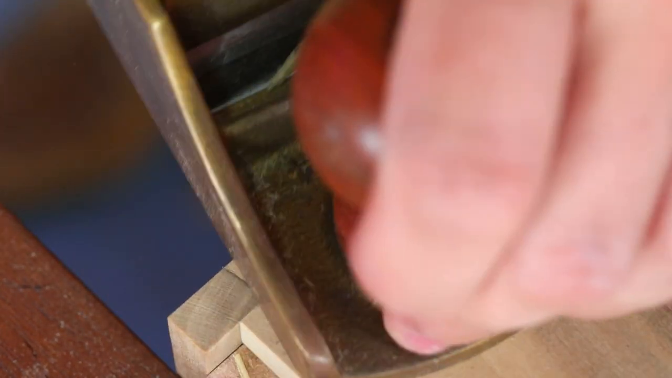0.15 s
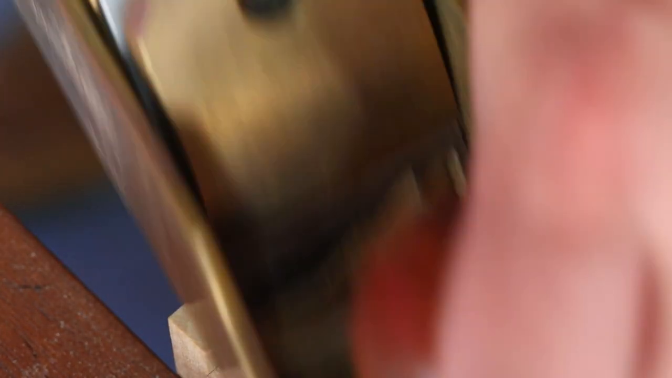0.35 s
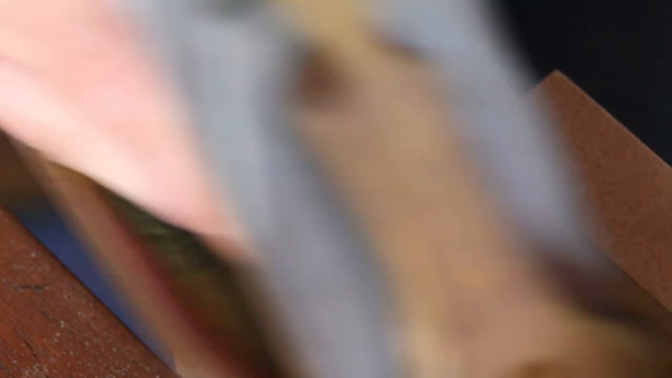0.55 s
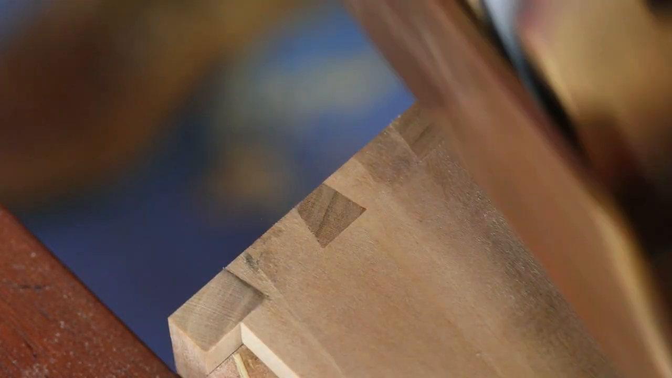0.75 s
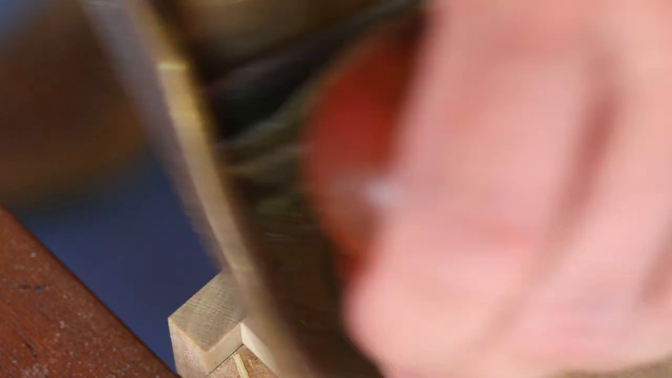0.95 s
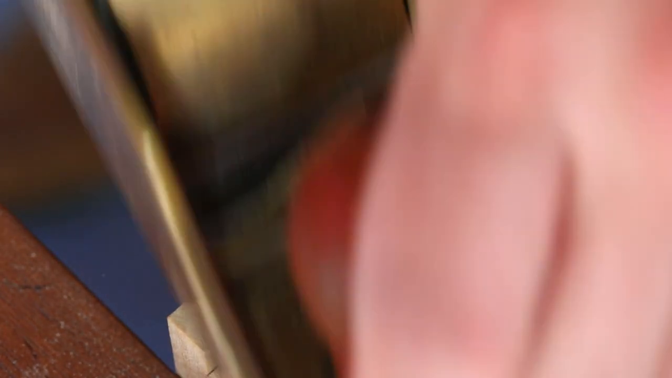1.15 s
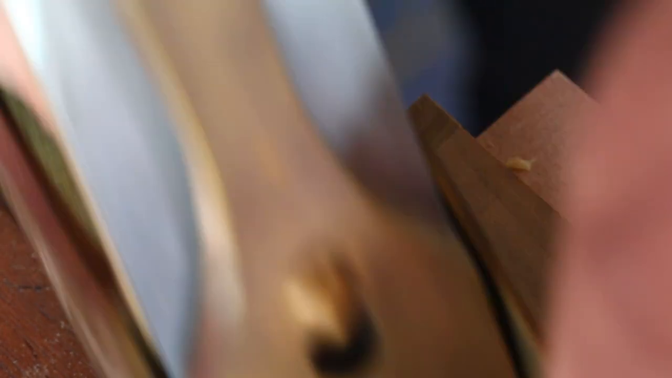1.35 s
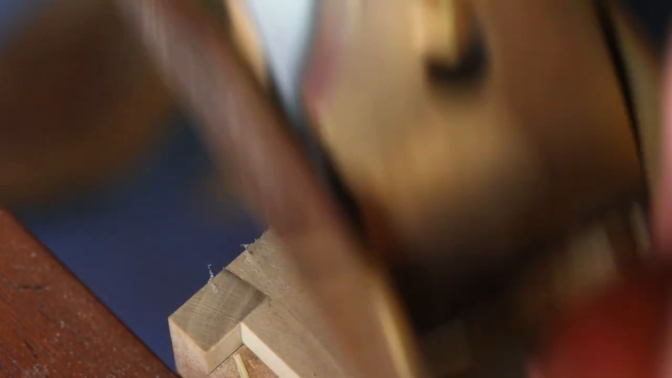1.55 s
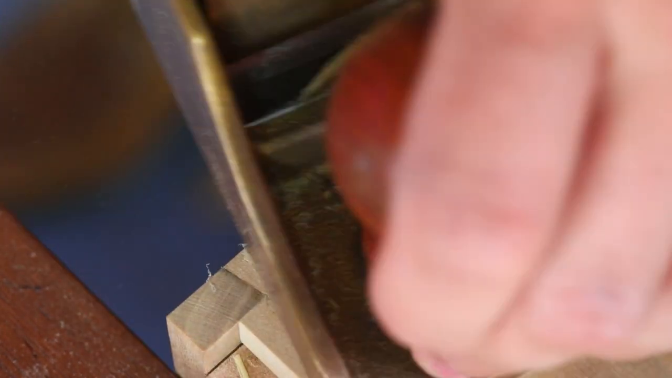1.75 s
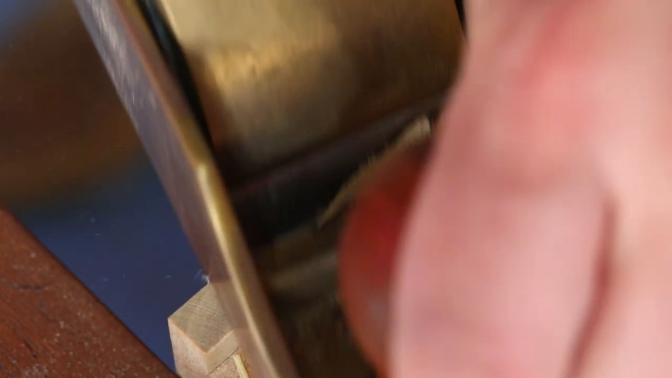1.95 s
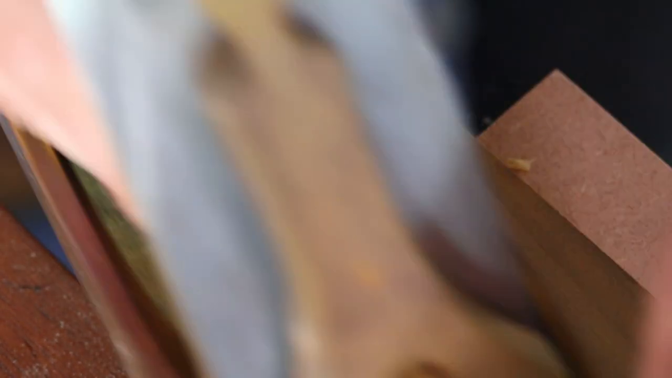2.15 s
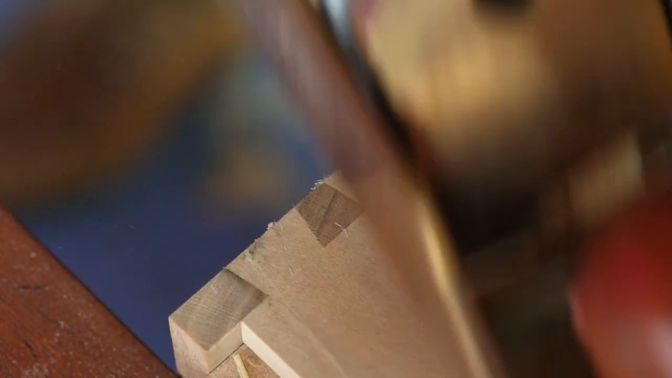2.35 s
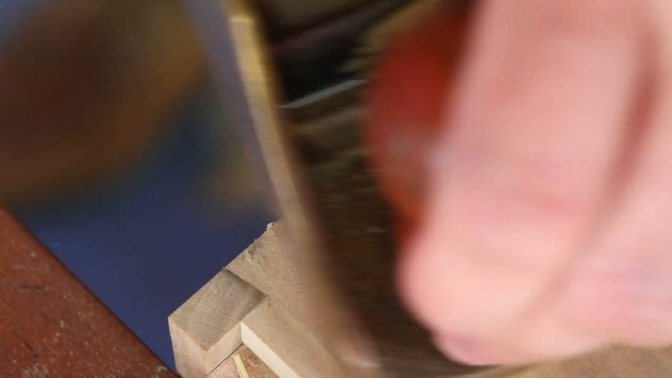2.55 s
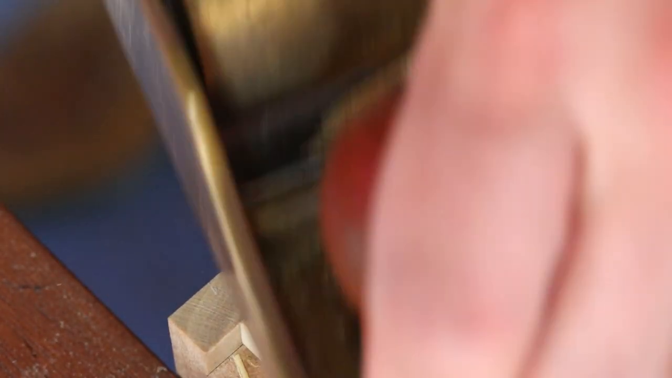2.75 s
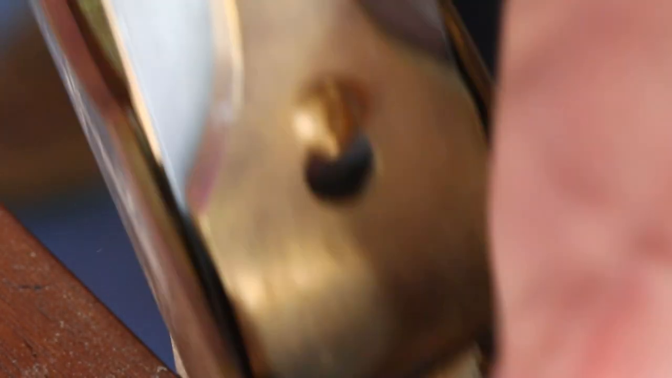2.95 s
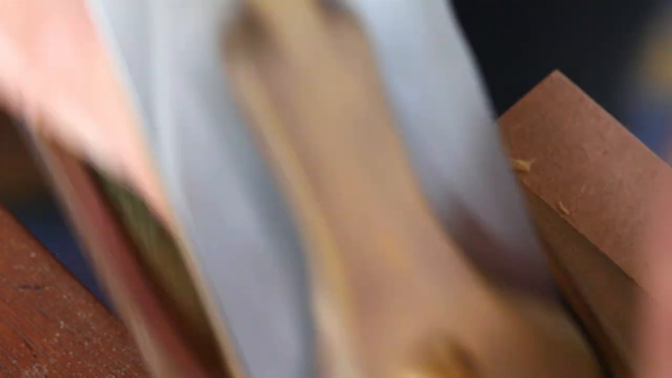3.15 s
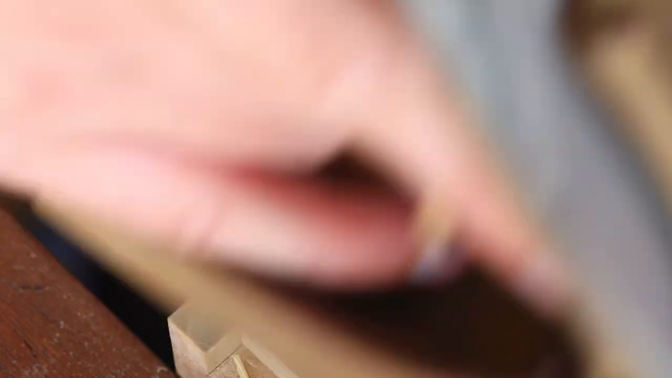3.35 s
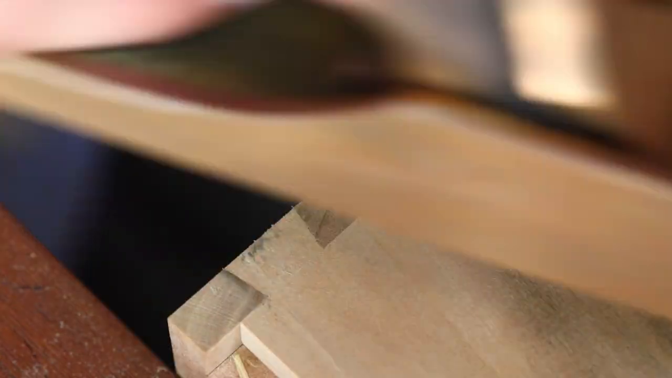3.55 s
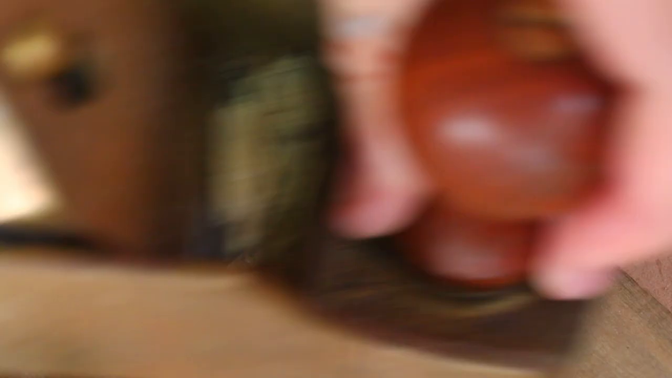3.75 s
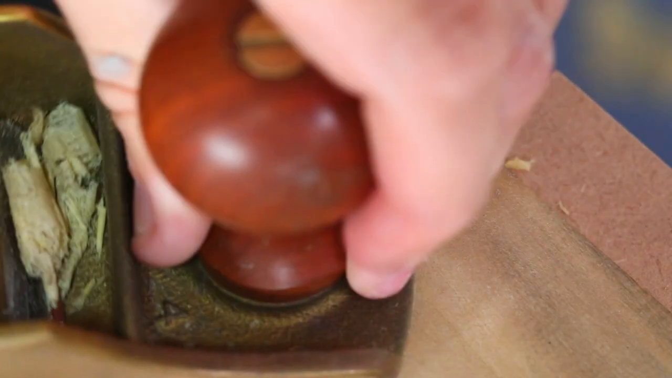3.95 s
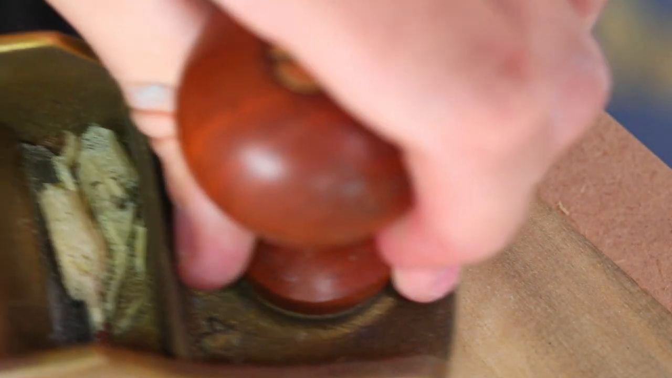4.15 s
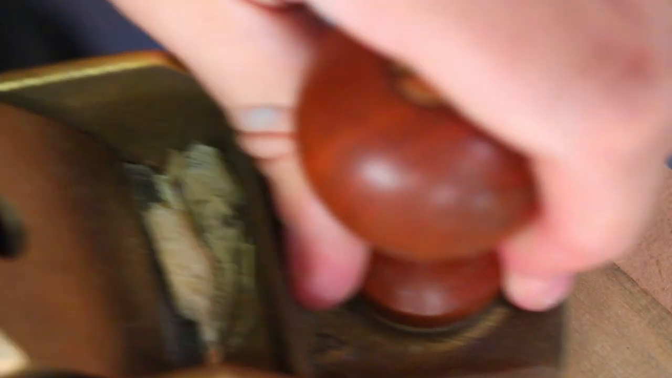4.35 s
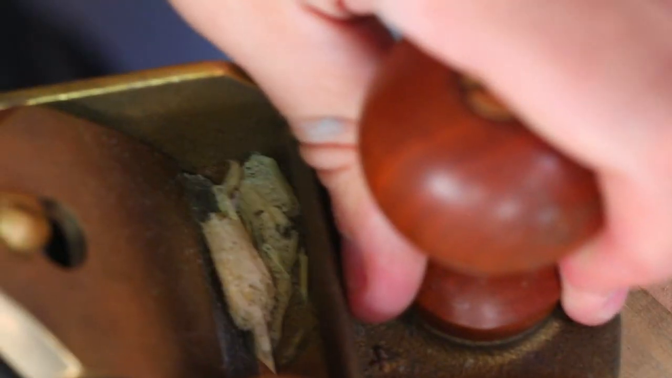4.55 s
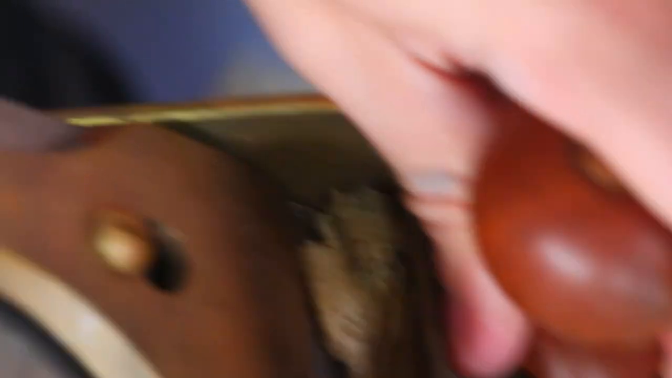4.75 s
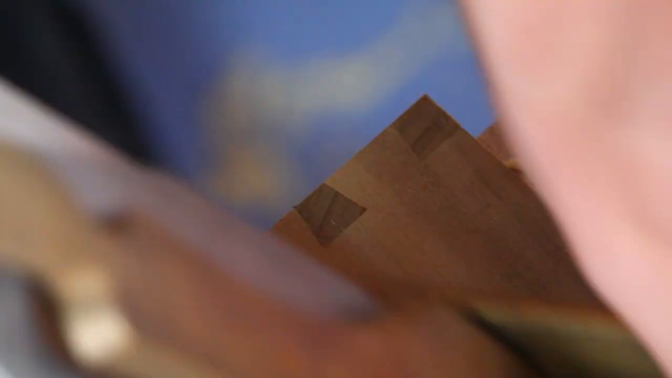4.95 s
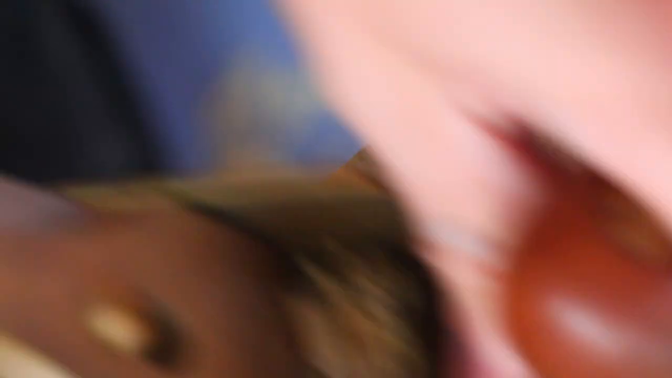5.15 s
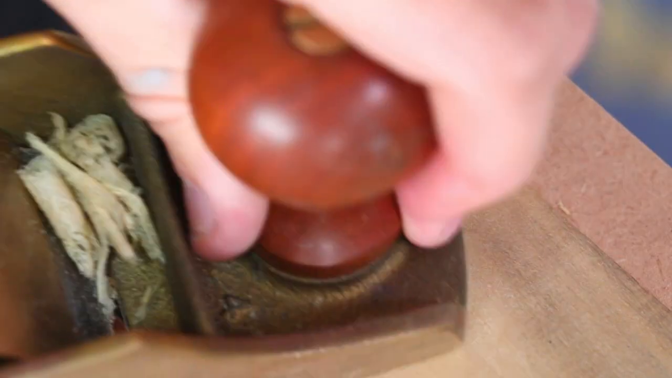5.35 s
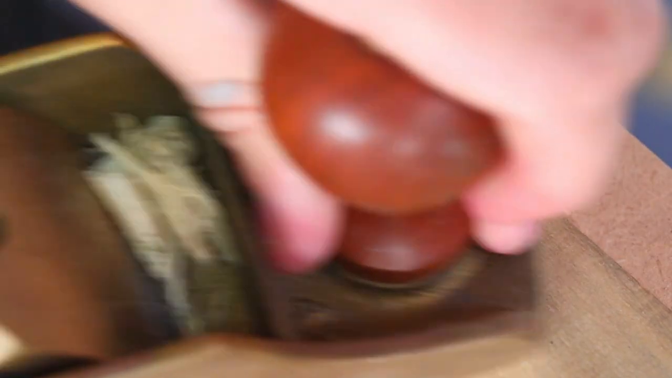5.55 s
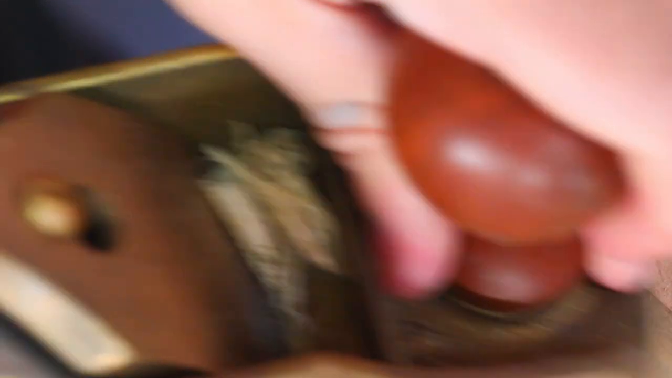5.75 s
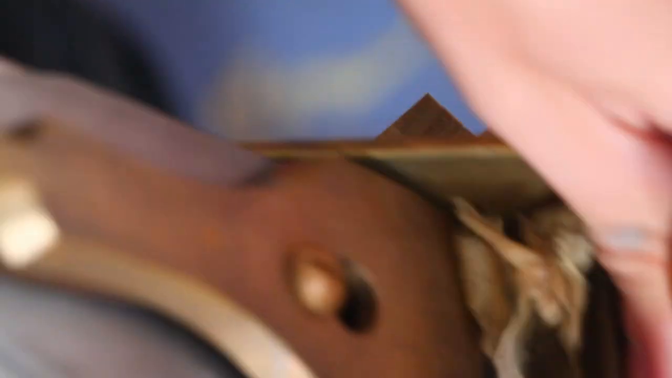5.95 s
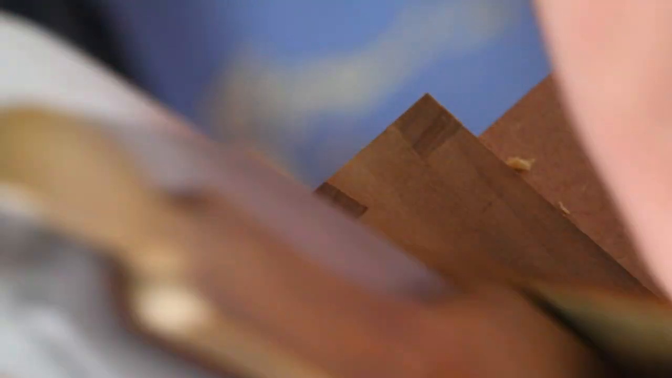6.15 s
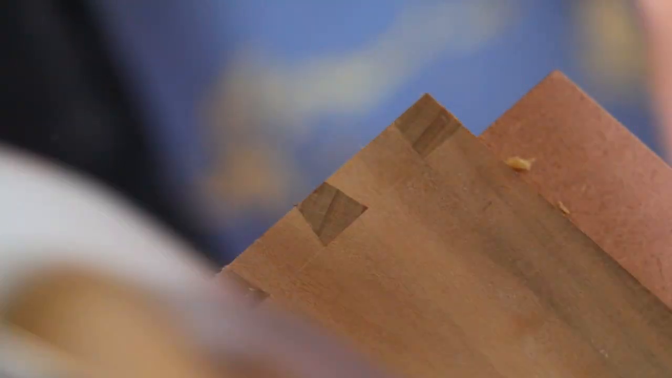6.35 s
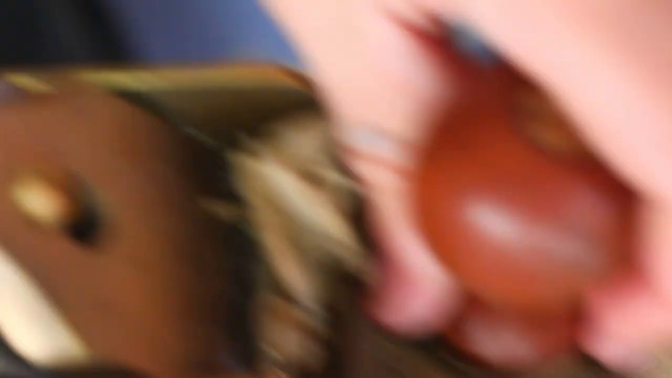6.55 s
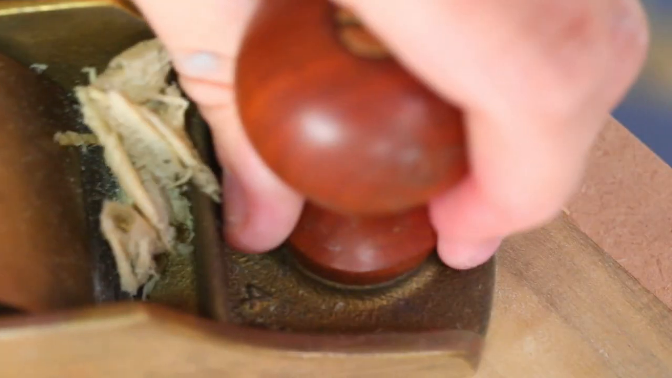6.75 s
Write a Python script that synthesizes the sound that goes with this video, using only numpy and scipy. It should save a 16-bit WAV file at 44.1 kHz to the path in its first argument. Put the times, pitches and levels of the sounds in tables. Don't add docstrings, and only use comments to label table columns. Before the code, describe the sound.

A small workshop heard close, nearly mono, with faint microphone hiss and a far low hum that swells and sinks. At 0.2 s a plane iron hits a wooden box with a crisp double knock, then a short hissing scrape at 0.4. The loudest blow, a ringing crack with metallic click and bench thump, lands at 1.07, followed by a bright singing scrape at 1.27. A softer double knock at 1.8 leads into quick choppy rasps around 2.0-2.2, another knock at 2.6 and scrapes at 2.85-3.25. The grip changes: near quiet, then a duller woody knock at 3.95. A light swelling rub runs from 4.5 to 5.0. Another knock at 5.4, then snagging scrapes with small metallic squeals at 5.7-6.2, a tiny scuff at 6.25 and a final dull knock at 6.75. Faint vice creaks come at 1.5, 5.0 and 5.5; the room answers with a short dull tail.

```python
import sys
import numpy as np
from scipy import signal
from scipy.fft import rfft, irfft, next_fast_len
from scipy.io import wavfile
from scipy.ndimage import uniform_filter1d, map_coordinates

SR = 44100
rng = np.random.default_rng(int(sys.argv[2]) if len(sys.argv) > 2 else 0)


def voltage_ratio(decibels):
    exponent = np.asarray(decibels, float) / 20
    return 10 ** exponent


def unload_wav(signal):
    wavfile.write(
        sys.argv[1],
        SR,
        np.round(np.clip(np.atleast_2d(signal).T, -1, 1) * 32767).astype(np.int16),
    )


N = 304113
FLAT_FROM = 3.6


def unit(x):
    return x / np.sqrt(np.mean(x ** 2) + 1e-20)


def along(points, hz):
    f, value = np.transpose(points)
    return np.interp(np.log(hz + 1), np.log(f + 1), value)


def wobble(rate):
    knots = rng.standard_normal(int(N * rate / SR) + 4)
    return map_coordinates(knots, [np.arange(N) * rate / SR])


def filtered(x, response):
    m = next_fast_len(N + SR // 4)
    spectrum = rfft(x, m) * response(np.fft.rfftfreq(m, 1 / SR))
    return unit(irfft(spectrum, m)[:N])


def colour(points):
    return lambda f: voltage_ratio(along(points, f)) * (f > points[0][0] / 2)


def resonances(peaks):
    def response(f):
        total = 0
        for k, (centre, width, db) in enumerate(peaks):
            damping = 1j * f * width
            total = total + (-1) ** k * voltage_ratio(db) * damping / (centre ** 2 - f ** 2 + damping)
        return total
    return response


def fibres(grit_db, patchy_db):
    z = signal.stft(rng.standard_normal(N), nperseg=512)[2]
    field = uniform_filter1d(rng.standard_normal(z.shape), size=2, axis=0)
    streaks = unit(uniform_filter1d(field, size=30, axis=1))
    noise = signal.istft(z * voltage_ratio(patchy_db * streaks), nperseg=512)[1][:N]
    return noise * voltage_ratio(grit_db * wobble(250))


def ringing(modes, t, attack):
    hz, db, t60 = np.transpose(modes)[:, :, None]
    level_luck, phase_luck, pitch_luck = rng.standard_normal((3, len(modes), 1))
    phase = 2 * np.pi * hz * (1 + 0.006 * pitch_luck) * t + 0.5 * phase_luck
    decay = voltage_ratio(db + 2 * level_luck - 60 * t / t60)
    ring = np.sum(decay * np.sin(phase), 0) * (1 - np.exp(-t / attack)) ** 2
    return ring / np.abs(ring).max()


def burst(points, t, t60, attack, tilt_db):
    hz = np.fft.rfftfreq(len(t), 1 / SR)
    shape = colour(points)(hz) * voltage_ratio(tilt_db * np.log2(hz / 1000 + 1))
    noise = irfft(rfft(rng.standard_normal(len(t))) * shape, len(t))
    noise = noise * voltage_ratio(-60 * t / t60) * (1 - np.exp(-t / attack)) ** 2
    return noise / np.abs(noise).max()


# t/s, box level/dB, then levels/dB re box of bench, sole ring and edge crack
BLOWS = [(0.198, -19.5, -1, 4, -8), (0.209, -21.5, -9.5, 2, -15), (1.067, -12, -6.5, 2.5, -5.5),
         (1.075, -18.5, -6.5, 11.5, -22), (1.272, -35, -3.5, 6.5, -24), (1.819, -23.5, 1.5, 6.5, -3.5),
         (1.828, -24.5, -4.5, -7, -26), (1.959, -32, -11, -7, -24), (2.282, -39.5, -10, -1.5, -29),
         (2.614, -28, -4, 4.5, -6.5), (2.84, -39.5, -13, 6, -18), (3.239, -35.5, -15.5, -17, -14),
         (3.767, -35, -9.5, -26.5, -26), (3.952, -21, -12, -7, -19), (5.383, -23.5, -10, 0, -9.5),
         (5.892, -64, -25, 27.5, -9), (5.951, -62, -14, 22.5, 10), (6.242, -44, 4, 2.5, -16),
         (6.75, -24.5, -10, -15.5, -24)]
# t/s, level/dB, f/Hz
VICE_CREAKS = [
    (1.511, -48.5, 440),
    (5.039, -51, 323),
    (5.5, -42.5, 553),
]


def knocks():
    out, t = np.zeros(N + 2 * SR), np.arange(SR // 4) / SR
    for s, box_db, bench_db, sole_db, crack_db in BLOWS:
        grip = int(s > FLAT_FROM)
        crack = voltage_ratio(crack_db) * fibre_crack(t, grip, box_db)
        body = box_and_bench(t, grip, bench_db)
        metal = plane_ring(t, grip, sole_db, crack_db)
        tail = walls()
        echo = signal.fftconvolve(np.pad(body, (180, 0)), tail)
        echo = echo + bright_echo(crack + voltage_ratio(-6) * metal, tail)
        start = round(s * SR)
        out[start:][:len(t)] += voltage_ratio(box_db) * (body + crack + metal)
        out[start:][:len(echo)] += voltage_ratio(box_db - 9.0) * echo
    for s, db, hz in VICE_CREAKS:
        creak = ringing([(hz, 0, 0.06), (1.25 * hz, -9, 0.04)], t, 0.0043)
        out[round(s * SR):][:len(t)] += voltage_ratio(db + 2.0) * creak
    return out[:N]


# f/Hz, level/dB, t60/s
BOX_MODES = [
    [(451, -2.5, 0.053), (503, -3, 0.041), (560, -6, 0.038), (697, -6.5, 0.03), (804, -2, 0.026),
     (897, -9, .03)],
    [(462, -4, 0.057), (488, 9, 0.034), (537, -8, 0.023), (753, -12, 0.043), (885, -8.5, 0.055),
     (958, -10, 0.025)],
]
# f/Hz, level/dB, t60/s
BENCH_MODES = [(40.9, -19, .12), (110.5, -12.5, 0.27), (148, -3, 0.19), (177.1, 2.5, 0.12), (201.4, 0, .1),
               (252.4, 2.5, 0.089), (276, -5.5, 0.12)]
# f/Hz, level/dB per Hz
LOOSE_PARTS = [(200, -21), (500, 7.5), (1000, 0.5), (2000, -10), (3000, -28.5)]
# f/Hz, level/dB per Hz
BENCH_SHUDDER = [(70, -32), (105, -4.5), (150, 1), (250, 1.5), (320, 0.5), (450, -30.5)]


def box_and_bench(t, grip, bench_db):
    box = ringing(BOX_MODES[grip], t, 0.00088)
    box = box + voltage_ratio(-2.0) * burst(LOOSE_PARTS, t, 0.056, 0.0023, tilt_db=-4)
    bench = ringing(BENCH_MODES, t, 0.0044)
    bench = bench + voltage_ratio(-8.0) * burst(BENCH_SHUDDER, t, 0.24, 0.02, tilt_db=-7.5)
    return box + voltage_ratio(bench_db) * bench


# f/Hz, level/dB per Hz
FIBRE_CRACK = [(1800, -22.5), (2500, 5), (3200, -2.5), (4300, -4), (5300, -5.5), (7000, -12),
               (10000, -16.5), (15000, -20.5)]


def fibre_crack(t, grip, box_db):
    snap = burst(FIBRE_CRACK, t, 0.033, 0.00089, tilt_db=-6 * grip + 0.13 * (box_db + 15.5))
    splinters = burst(FIBRE_CRACK, t, 0.19, 0.003, tilt_db=1.0 - 3 * grip)
    return snap + voltage_ratio(-19.5) * splinters


# f/Hz, level/dB, t60/s
SOLE_MODES = [(1140, -6, .03), (1195, 0, .045), (1260, -5, .03), (1357, -10, .025)]
# f/Hz, level/dB, t60/s
IRON_MODES = [(1517, -1.5, 0.0077), (1550, -7.5, .02), (1794, 4.5, 0.022), (1882, -4, .025),
              (1945, 7, .025), (2050, 6, 0.022), (2240, -4, .02)]


def plane_ring(t, grip, sole_db, crack_db):
    iron_db = [9.5, 5][grip] + 1.4 * crack_db
    return voltage_ratio(sole_db) * ringing(SOLE_MODES, t, 0.0013) + voltage_ratio(iron_db) * ringing(IRON_MODES, t, 0.0006)


# f/Hz, level/dB per Hz
SOLE_HISS = [(5500, -42), (7000, -8), (9000, -6), (12000, -1), (14000, 0), (16000, -9)]
# f/Hz, level/dB per Hz
CUT_RASP = [(1000, -31), (1700, 0.5), (2210, -6.5), (2810, -5.5), (3070, -0.5), (3370, -8), (4010, -5),
            (5780, -11), (6420, -13.5), (7500, -16), (9750, -13), (16500, -120)]
# f/Hz, level/dB per Hz
RUB_RUMBLE = [(71, -52), (120, -11), (189, -4.5), (394, -16), (424, -8.5), (598, -5.5), (807, 0.5),
              (1050, -5), (1360, -34), (2310, -120)]
# f/Hz, level/dB per Hz
BENCH_THUD = [(90, -17), (150, -2), (200, 0), (260, -4.5), (380, -26)]
# f/Hz, width/Hz, level/dB
BLADE_PEAKS = [
    [(7360, 180, -12), (8310, 250, -4.5), (11140, 600, -6), (11700, 60, -1.5)],
    [(7430, 110, -19), (8800, 74, -18), (9750, 130, -25), (10750, 255, 4.5), (12550, 190, -10.5),
     (14500, 100, -8.5)],
]
# f/Hz, width/Hz, level/dB
GRAZE_PEAKS = [
    [(2390, 62, -13), (3055, 61, -2), (3500, 9.9, -5.5), (4286, 130, 0.5), (5090, 31, -7), (5580, 370, -3)],
    [(2170, 11, -8), (3060, 42, -2), (3536, 49, -1.5), (4080, 59, 4), (4330, 32, -5.5), (5540, 22, -2.5)],
]
# f/Hz, width/Hz, level/dB
SINGING_PEAKS = [
    [(1319, 140, 13), (1510, 33, -17.5), (1730, 80, -3.5)],
    [(830, 39, -6), (1172, 69, -3.5), (1286, 83, -2.5), (1866, 85, -15.5)],
]


def slides():
    hiss_gain, rasp_gain, ring_gain, rumble_gain, blade_gain = motion()
    steep = np.arange(N) / SR < FLAT_FROM
    fine, coarse, deep = fibres(1.7, 1.8), fibres(1.8, 1.8), fibres(2.6, 1.2)
    hiss = hiss_gain * filtered(fine, colour(SOLE_HISS))
    grips = []
    for blade, graze, singing in zip(BLADE_PEAKS, GRAZE_PEAKS, SINGING_PEAKS):
        fizz = filtered(fine, lambda f: resonances(blade)(f) * (f > 6000))
        rasp = filtered(coarse, lambda f: colour(CUT_RASP)(f) + voltage_ratio(0.5) * resonances(graze)(f) * (f > 1500))
        ring = filtered(deep, resonances(singing))
        grips.append(hiss + blade_gain * fizz + rasp_gain * rasp + ring_gain * ring)
    rumble = filtered(fibres(3.2, 0.66), colour(RUB_RUMBLE))
    thud = voltage_ratio(np.where(steep, -10, -4.5)) * filtered(deep, colour(BENCH_THUD))
    rub = np.where(steep, *grips) + rumble_gain * (rumble + thud)
    return voltage_ratio(1.1 * wobble(40)) * rub


# t/s, length/s, start level/dB, end level/dB, pressure/dB
PLANE_STROKES = [(0.386, .19, -46, -57, 1), (1.272, 0.14, -44.5, -53.5, 1.5),
                 (1.606, 0.096, -70.5, -93.5, -11), (1.962, 0.046, -48, -50, 4),
                 (2.05, .07, -55, -48.5, 0.5), (2.129, 0.083, -56, -54, 0), (2.636, 0.14, -67.5, -84, 0),
                 (2.842, 0.1, -47, -53.5, 0.5), (3.002, .21, -54.5, -66, 1),
                 (3.248, .04, -55.5, -55.5, 0.5), (4.5, 0.026, -56.5, -56.5, -2),
                 (4.638, 0.34, -59, -47.5, -1.5), (2.48, .13, -89.5, -79, 10), (4.25, 0.21, -79, -70, -19),
                 (5.06, 0.27, -75, -92, -3), (5.405, 0.12, -85, -92, 9), (5.696, 0.029, -46, -46, -1),
                 (5.814, 0.076, -54, -56.5, 0), (5.896, 0.038, -45.5, -49.5, 2), (5.95, .28, -52, -57.5, 1),
                 (6.255, 0.021, -61, -57, 3.5), (6.31, .28, -68, -68, -16)]
# level/dB at full speed, gain/dB per dB of slowing,
# share of pressure, share of bite
RASP_BY_GRIP = [
    (0, 0.4442, 0.59, -3.5),
    (-2, 0.3256, 0.91, -1.44),
]
RING_BY_GRIP = [
    (1.5, 0.2, 1.1, 4.2),
    (3.5, 0.5, 1.38, 0.65),
]
RUMBLE_BY_GRIP = [
    (-6, 0.36, 1, 1),
    (-4.5, 0.71, 0.38, 0.2),
]
BLADE_BY_GRIP = [
    (-3.5, -0.17, 0.23, 1.2),
    (-3, -0.32, 0.54, .4),
]


def motion():
    full_db = -50
    lead = SR // 10
    power, t = np.zeros((5, N + 2 * SR)), np.arange(-lead, SR // 2) / SR
    for s, length, start_db, end_db, press_db in PLANE_STROKES:
        grip = int(s > FLAT_FROM)
        before = np.maximum(1398 * t, [-13.5, -15][grip] + 253 * t)
        after = -[390, 519.5][grip] * np.maximum(t - length, 0)
        speed = np.interp(t, [0, length], [start_db, end_db]) + np.where(t < 0, before, after)
        keenness = np.clip(-2.5 + (start_db - full_db) / 9, 0, 1)
        bite = 4.5 * keenness * np.exp(-np.abs(t) / 0.06)
        slowing = full_db - np.where(t < 0, start_db, speed)
        parts = [0 * t]
        for law in (RASP_BY_GRIP, RING_BY_GRIP, RUMBLE_BY_GRIP, BLADE_BY_GRIP):
            db, slow, share, keen = law[grip]
            parts.append(db + slow * slowing + share * press_db + keen * bite)
        parts[1] = parts[1] + [3, 3.5][grip] * (np.clip(t / length, 0, 1) - 0.5)
        power[:, round(s * SR) - lead:][:, :len(t)] += voltage_ratio(2 * (speed + bite + np.array(parts)))
    return np.sqrt(power[:, :N])


# t/s, length/s, f/Hz, width/Hz, level/dB
GRAIN_SNAGS = [(.405, .06, 1310, 200, -41.5), (1.275, 0.016, 1360, 200, -33),
               (1.367, 0.057, 4240, 500, -54), (1.974, 0.047, 650, 250, -47),
               (2.17, 0.052, 5200, 1200, -53.5), (2.838, 0.034, 730, 270, -42),
               (2.843, 0.028, 1330, 320, -39), (2.9, 0.059, 1450, 300, -53), (3.254, 0.049, 2600, 550, -47),
               (3.256, .04, 1100, 820, -51), (4.492, 0.068, 1200, 250, -49), (5.71, 0.033, 700, 220, -46),
               (5.707, .05, 4200, 1500, -60), (5.891, .048, 1250, 170, -34.5),
               (5.898, 0.039, 2870, 700, -47), (5.958, .035, 1230, 150, -37),
               (6.131, 0.084, 1130, 120, -44), (6.258, .04, 4100, 1600, -57),
               (5.078, 0.16, 2500, 1200, -66), (4.62, .17, 200, 82, -53.5), (6.45, 0.16, 340, 170, -61.5),
               (5.7, .05, 12000, 3000, -50), (4.505, 0.04, 3800, 1800, -60.5), (0.533, .09, 2070, 500, -55)]


def snags():
    out, tearing = np.zeros(N), fibres(2.2, 1.1)
    for s, length, hz, width, db in GRAIN_SNAGS:
        t = np.arange(round(length * SR)) / SR
        swell = np.sin(np.pi * (t / length) ** 0.58)
        sung = filtered(tearing, lambda f: resonances([(hz, width, 0)])(f) ** 2)
        start = round(s * SR)
        out[start:][:len(t)] += voltage_ratio(db) * swell * sung[start:][:len(t)]
    return out


# f/Hz, t60/s
WALL_DECAY = [(100, 0.34), (300, 0.52), (1000, 0.47), (3000, 0.54), (10000, 0.23)]


def walls():
    hz, t, z = signal.stft(rng.standard_normal(SR * 2 // 5), SR, nperseg=256)
    decay = voltage_ratio(-60 * t / along(WALL_DECAY, hz)[:, None])
    tail = signal.istft(z * decay, SR, nperseg=256)[1]
    return tail / np.linalg.norm(tail)


def bright_echo(x, tail):
    length = len(x) + len(tail) + 179
    m = next_fast_len(length + 1)
    broad = np.sqrt(np.abs(uniform_filter1d(np.abs(rfft(x, m)) ** 2, size=160)))
    return irfft(rfft(np.pad(tail, (400, 0)), m) * broad, m)[:length]


# t/s, hum level/dB
FAR_MACHINE = [(0.0, -65), (0.52, -59), (0.75, -65), (0.98, -69), (1.19, -57), (1.56, -67), (1.94, -70),
               (2.42, -69), (4.11, -61.5), (4.4, -65.5), (4.71, -63), (5.28, -64.5), (5.61, -51.5),
               (6.07, -58.5), (6.9, -58.5)]
# f/Hz, level/dB per Hz
MACHINE_HUM = [(15, -17.5), (30, -14), (50, -5), (65, -8.5), (80, 5.5), (100, -1.5), (130, -17.5),
               (200, -41)]
# f/Hz, level/dB per Hz
ROOM_AIR = [(59, -29.5), (100, -7.5), (320, -9.5), (400, -13.5), (568, -14.5), (615, -18), (756, -12),
            (1040, -16.5), (4500, -36), (5850, -63), (9900, -120)]


def workshop():
    t = np.arange(N) / SR
    hum_db = np.interp(t, *np.transpose(FAR_MACHINE))
    hum = voltage_ratio(hum_db + 1.5 * wobble(3.2)) * filtered(rng.standard_normal(N), colour(MACHINE_HUM))
    rumble_gain = motion()[3]
    power = voltage_ratio(2 * -63) + voltage_ratio(2 * -2.5) * uniform_filter1d(rumble_gain ** 2, size=6000)
    for s, box_db, *_ in BLOWS:
        if box_db > -30:
            u = np.maximum(t - s, 0)
            murmur = voltage_ratio(-43.5 + 0.72 * box_db - 60 * u / 1.3) * (1 - np.exp(-u / 0.09))
            power = power + murmur ** 2
    air = filtered(fibres(1.2, 1.5), colour(ROOM_AIR))
    return hum + np.sqrt(np.abs(power)) * voltage_ratio(1.4 * wobble(8.1)) * air


def scene():
    blows = knocks()
    rub = slides() + snags()
    rub_echo = voltage_ratio(-11.5) * signal.fftconvolve(rub, walls())[:N]
    return np.tile(blows + rub + rub_echo + workshop(), (2, 1))


def low_pass(x):
    return signal.sosfilt(signal.butter(12, 16650, fs=SR, output="sos"), x)


# f/Hz, level/dB per Hz
PREAMP_HISS = [(20, 0), (3000, 0), (6000, -1), (12000, 0), (16000, -1)]


def record(dry):
    left, right, shared = [filtered(rng.standard_normal(N), colour(PREAMP_HISS)) for _ in range(3)]
    wired = dry + voltage_ratio(-68.5) * (np.array([left, right]) + voltage_ratio(-3.5) * shared)
    m = next_fast_len(N)
    in_band = np.fft.rfftfreq(m, 1 / SR) < 15800
    mix = irfft(rfft(wired, m) * in_band, m)[:, :N]
    return low_pass(mix)


dry = scene()
out = record(dry)
unload_wav(out)
```